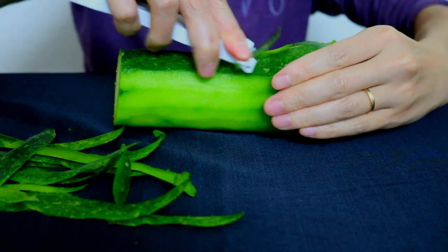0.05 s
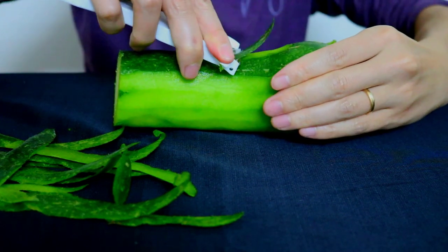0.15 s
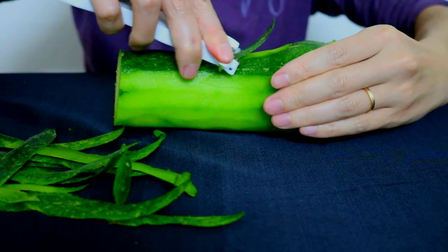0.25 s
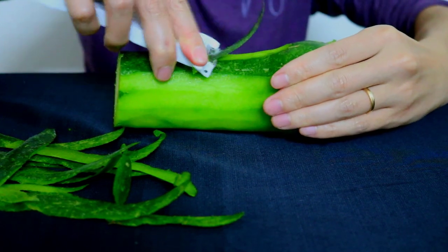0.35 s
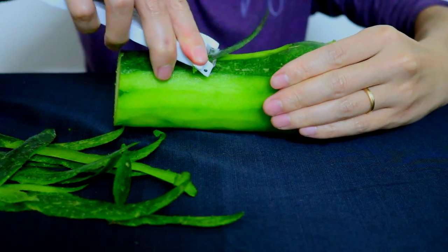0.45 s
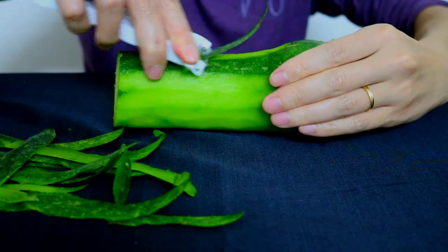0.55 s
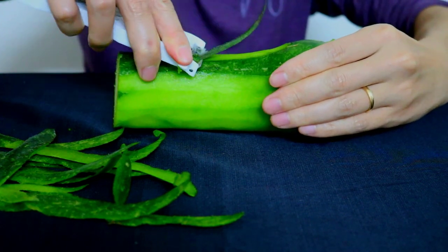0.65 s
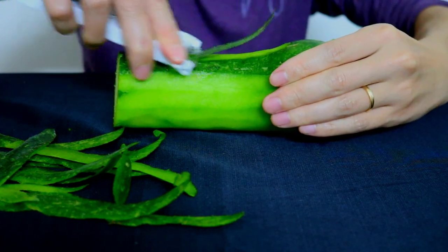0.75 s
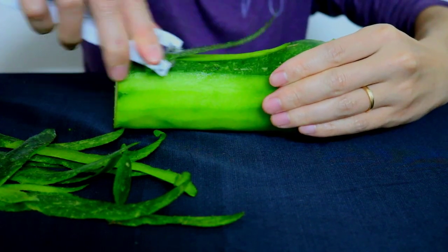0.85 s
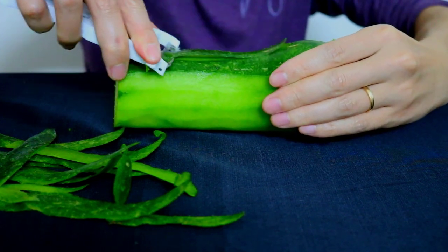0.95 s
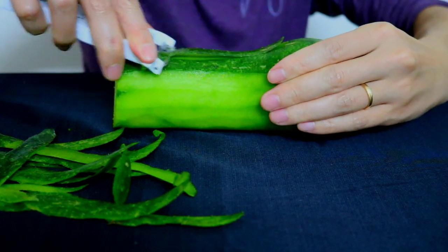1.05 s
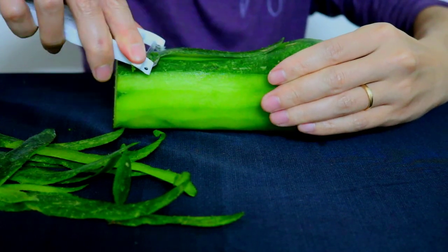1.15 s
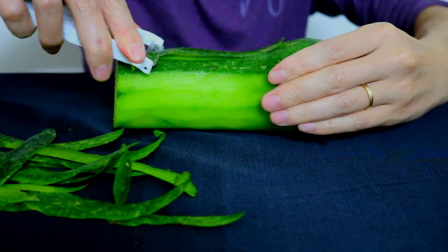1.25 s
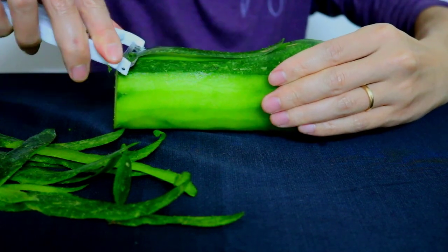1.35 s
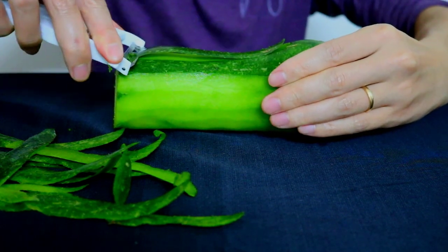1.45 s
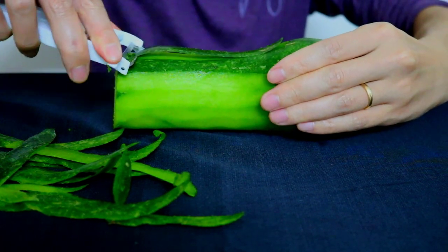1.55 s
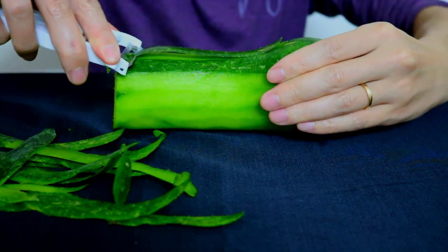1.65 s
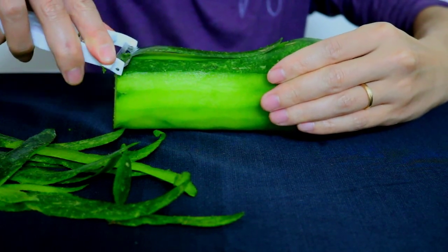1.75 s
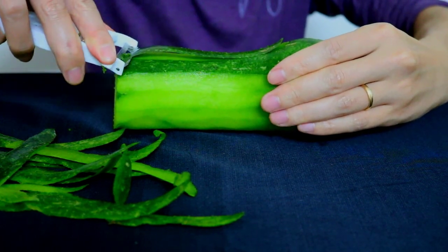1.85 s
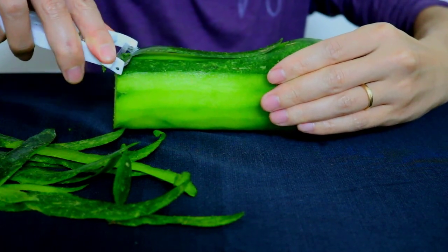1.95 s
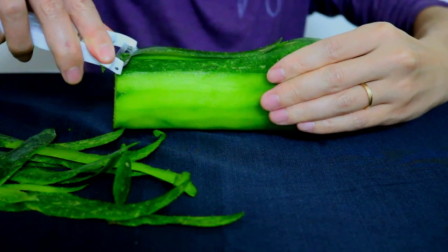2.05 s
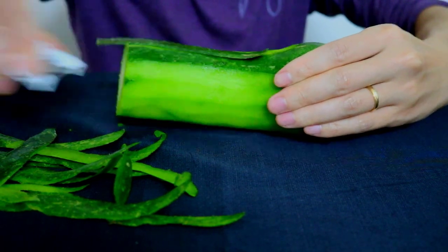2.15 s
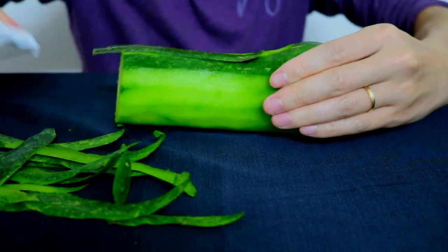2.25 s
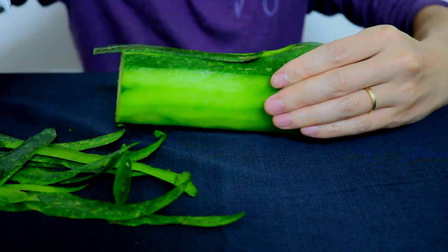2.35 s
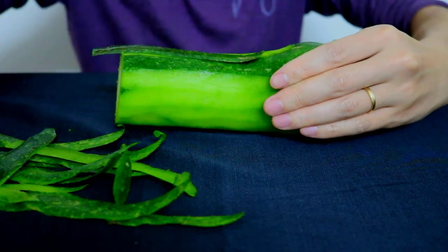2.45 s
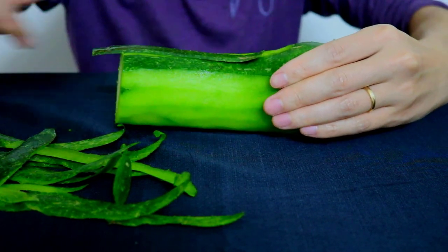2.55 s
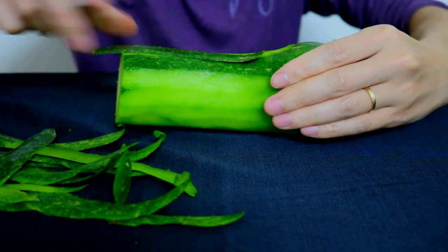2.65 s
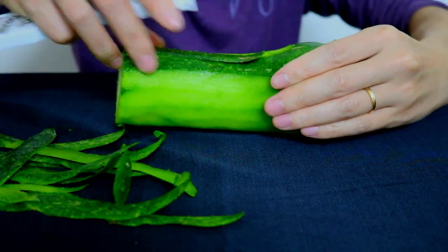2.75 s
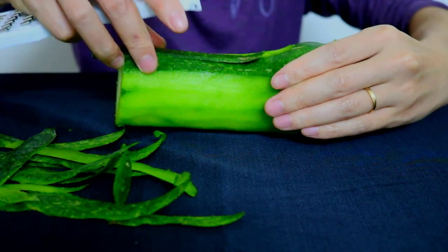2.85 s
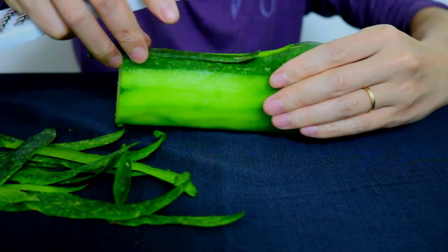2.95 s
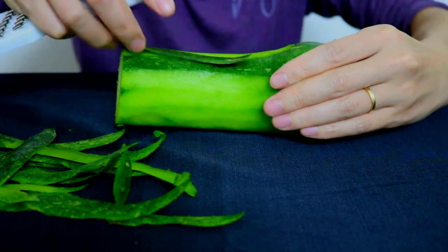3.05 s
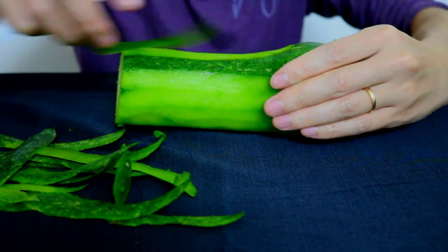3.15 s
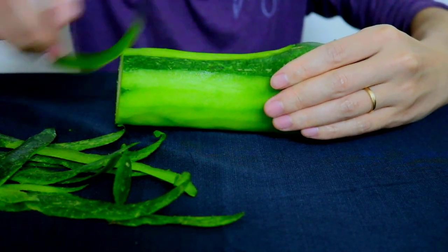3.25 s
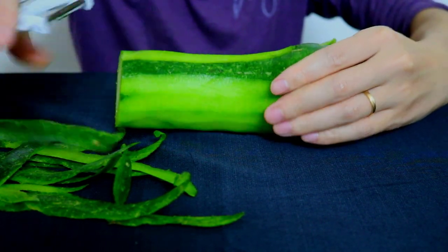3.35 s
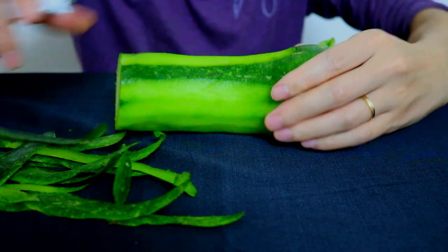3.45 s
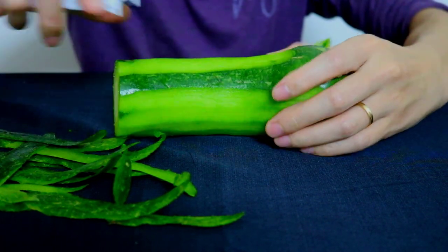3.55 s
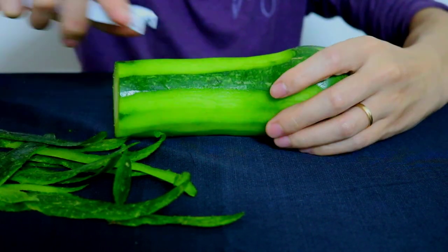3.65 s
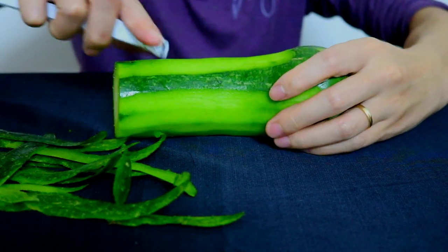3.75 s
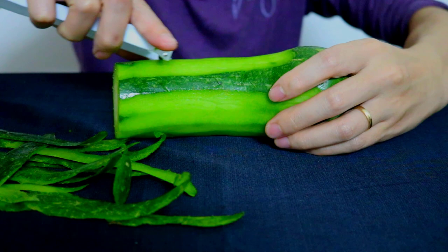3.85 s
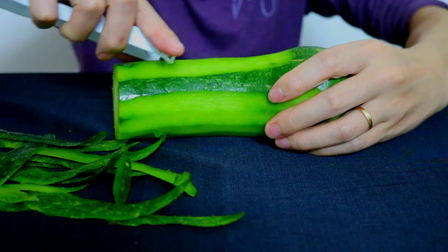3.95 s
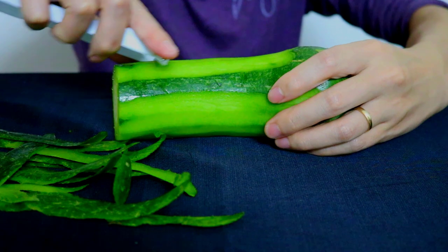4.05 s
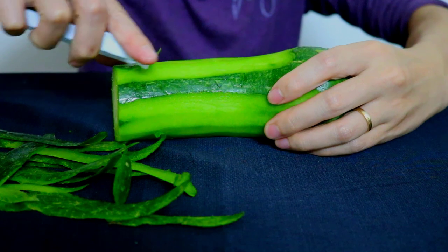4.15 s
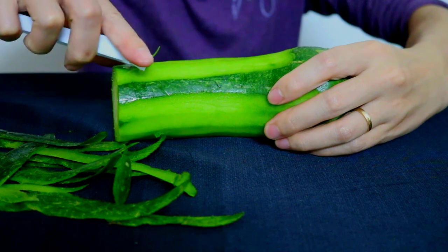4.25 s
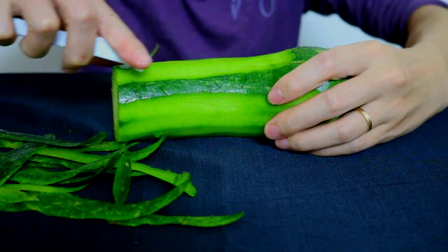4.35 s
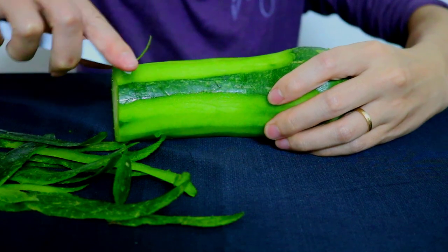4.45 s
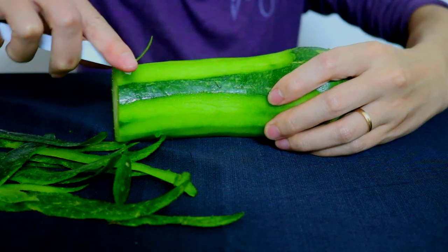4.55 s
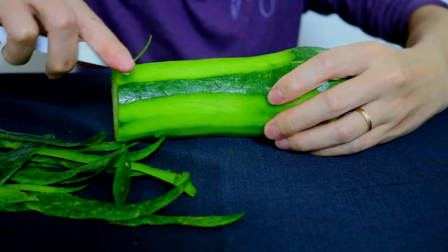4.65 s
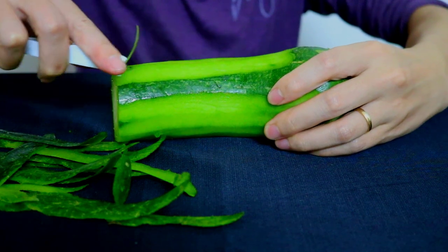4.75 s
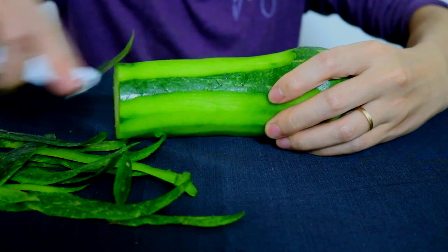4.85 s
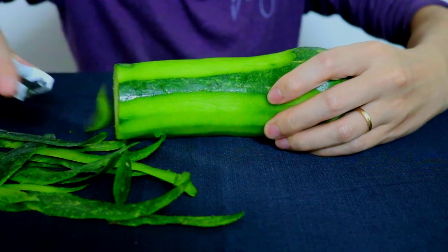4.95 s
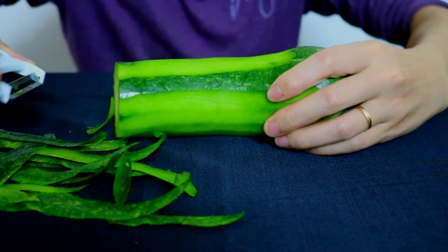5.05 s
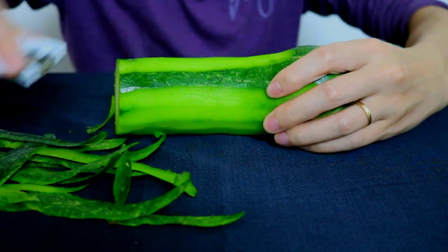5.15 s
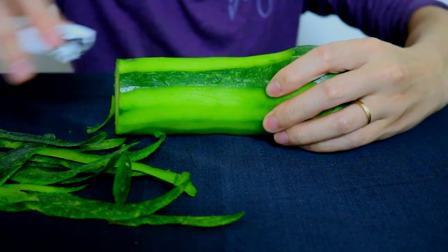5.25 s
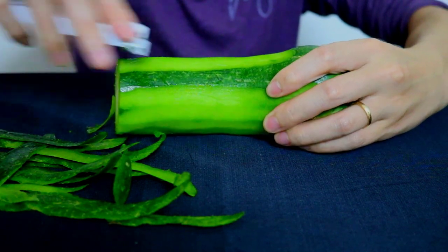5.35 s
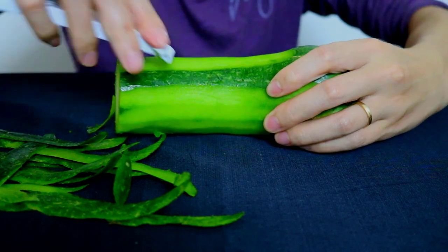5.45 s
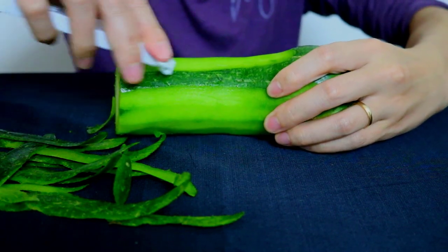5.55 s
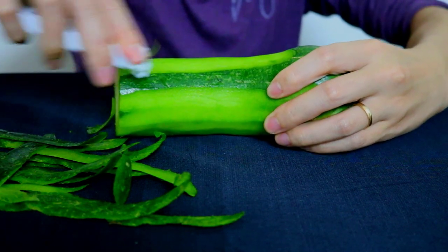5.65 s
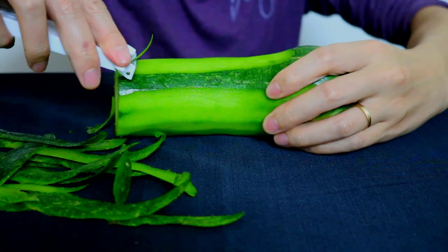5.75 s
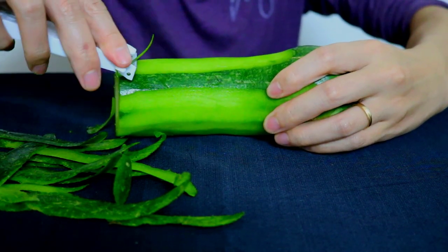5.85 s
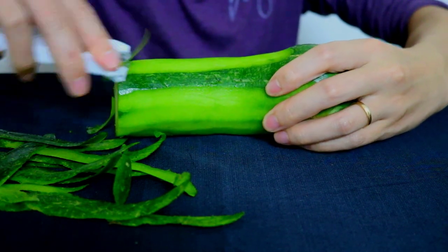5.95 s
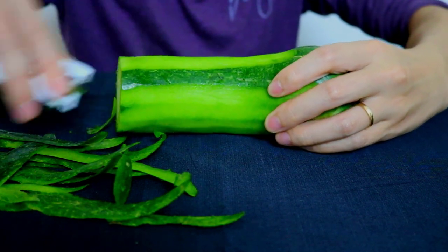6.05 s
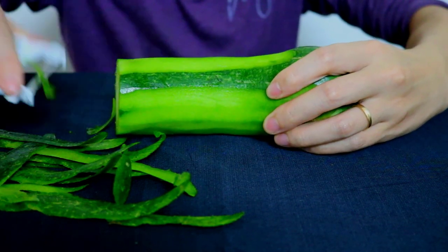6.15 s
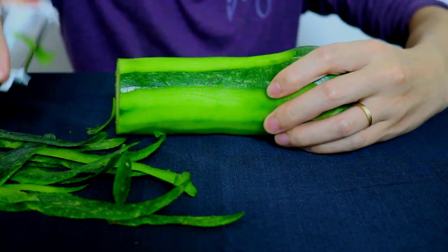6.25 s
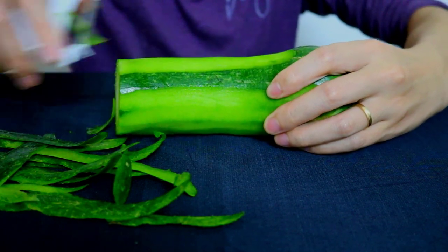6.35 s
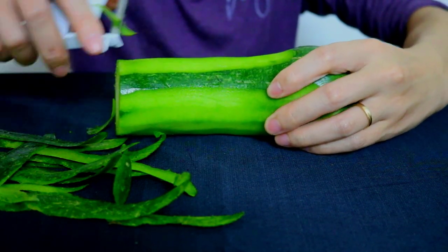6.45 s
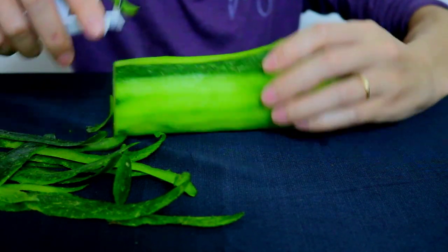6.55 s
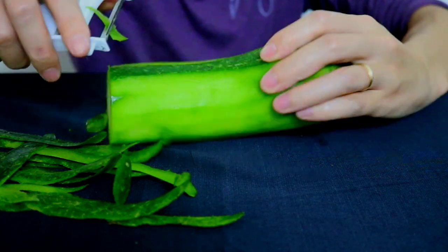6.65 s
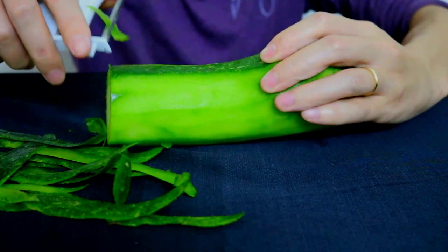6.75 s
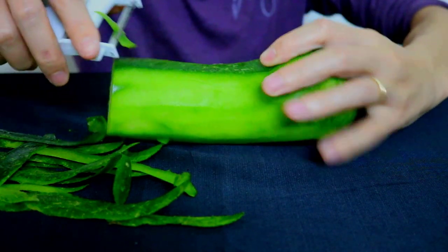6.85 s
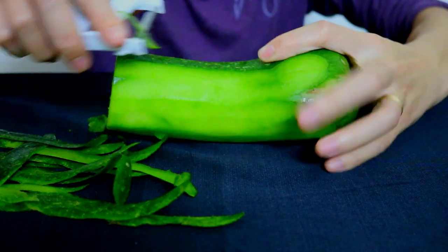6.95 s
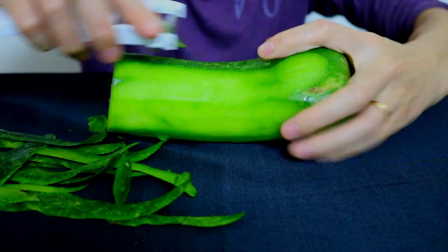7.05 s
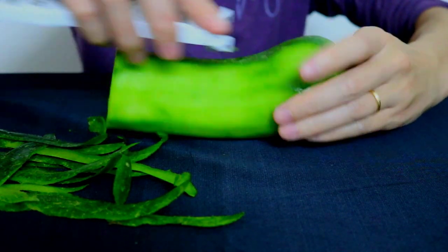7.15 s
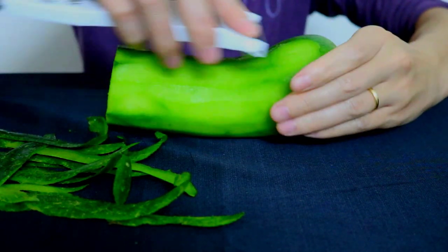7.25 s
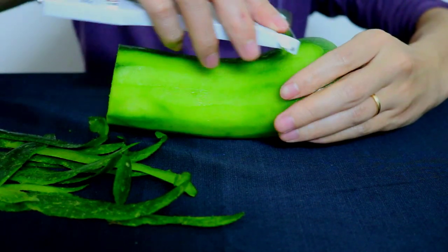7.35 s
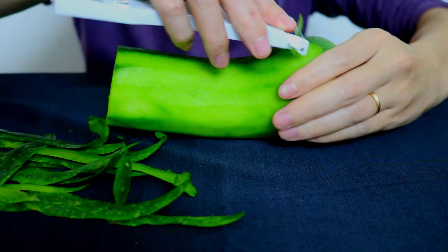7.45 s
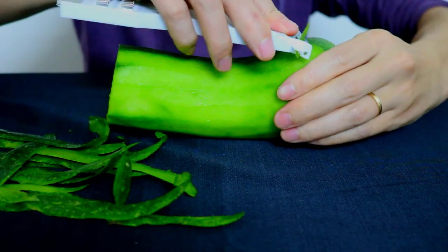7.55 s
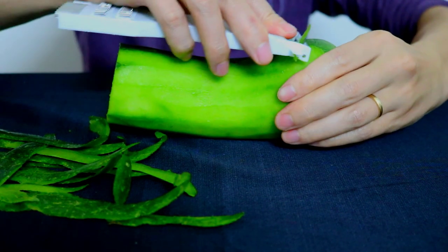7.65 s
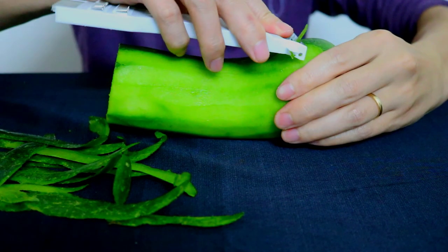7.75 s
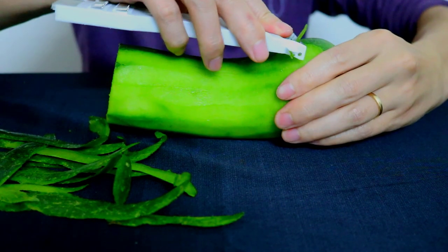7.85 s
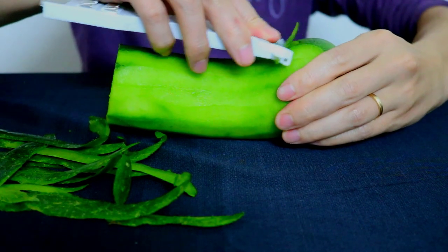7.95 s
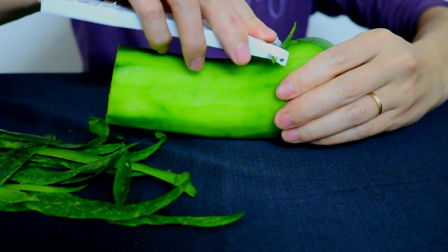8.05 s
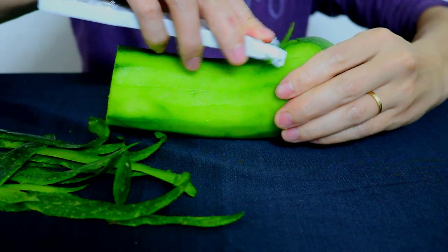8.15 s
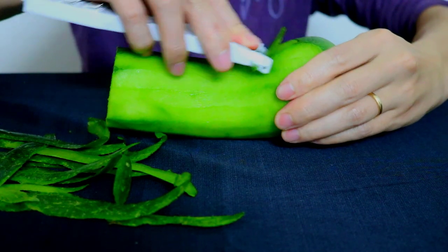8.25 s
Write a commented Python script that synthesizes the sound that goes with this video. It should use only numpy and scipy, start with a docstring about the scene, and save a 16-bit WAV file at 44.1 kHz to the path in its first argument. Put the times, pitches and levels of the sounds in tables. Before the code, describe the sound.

A peeler rasps in short quick strokes along a firm hollow melon, with sharp clicks, dull knocks and rustling pauses in a small room.

```python
"""Nine quick peeler strokes rasp along a firm green melon on a cloth-covered table, close to the microphone.
A sharp, bright snap ends that run; hands then brush and rub, with small ticks and knocks, until strokes resume at 4 s.
Slower strokes, clicks and knocks mix until 6.7 s; handling and knocks lead to two last strokes from 8 s.
Random snaps make the rasp and shake the rings of peeler and melon; noise bursts make the clicks.
Handling is filtered snaps, knocks are struck rings; a small room echoes over quiet air and a faint high whine."""
import sys
import numpy as np
from scipy import signal
from scipy.fft import rfft, irfft
from scipy.io import wavfile
from scipy.ndimage import uniform_filter1d

SR = 44100
rng = np.random.default_rng(int(sys.argv[2]) if len(sys.argv) > 2 else 0)


def master(y):
    """Save y as 16-bit WAV."""
    cut = np.clip(np.atleast_2d(y).T, -1, 1)
    pcm = np.round(cut * 32767)  # scale
    wavfile.write(sys.argv[1], SR, pcm.astype(np.int16))


N = 366471
TIME = np.arange(N) / SR
TOP_HZ = 15850  # upper edge of the room echoes and of the whole sound

# Strokes of the blade. Each row: start in seconds, swell in seconds, fade in seconds,
# rind rasp, melon body and peeler ring in dB (each before its layer trim),
# place from 0 at the held end to 1 at the cut end, firmness in dB per octave (more tilts the ring upwards),
# and the delay of the melon's crest in seconds (before the force lead).
STROKES = [ (0.0, 0.0035, 0.12, -51, -42.5, -38, 0.6, 5, 0.015),
           (0.123, 0.046, 0.065, -26.5, -26, -19.5, 0, 4, 0.036),
           (0.342, 0.041, 0.09, -27.5, -25, -16.5, 0.04, 2.5, -0.017),
           (0.601, 0.055, .060, -33, -24.5, -23.5, 0.16, 2.5, 0.015),
           (0.827, 0.055, 0.087, -27.5, -22, -17.5, 0.44, 2, 0.0074),
           (1.111, 0.053, 0.049, -30, -22, -27, 0.73, -0.5, 0.014),
           (1.335, .061, 0.066, -26.5, -20, -27.5, 0.85, 1.5, 0.033),
           (1.741, 0.049, 0.042, -42, -29, -56, 0.93, -1.5, 0.012),
           (2.158, 0.042, 0.035, -24, -16.5, -31.5, 0.6, 1, -0.0095),
           (4.077, 0.14, 0.084, -33, -24.5, -25.5, 0.96, 1, 0.017),
           (4.444, 0.046, 0.055, -28.5, -20.5, -25, 1, 1, 0.014),
           (4.723, 0.023, 0.24, -38.5, -29, -40.5, 1, -1, -0.01),
           (4.866, 0.027, 0.011, -32, -20, -23.5, 0.96, 4.5, 0.0013),
           (5.64, 0.091, 0.072, -28, -23, -21.5, 0.64, 0, 0.053),
           (6.021, 0.056, 0.02, -26.5, -18.5, -23, 0.68, 2, -0.0015),
           (6.646, 0.07, 0.087, -34.5, -37, -54, .53, -2, -0.048),
           (7.963, 0.049, 0.077, -31.5, -19, -22, 0.43, -2, -0.023),
           (8.248, 0.028, 0.075, -22.5, -20, -16, 0.34, 0, .025), ]
# How strongly each pitch is present in the rasp. Each row: frequency in Hz, relative level in dB per Hz.
RASP_SPECTRUM = [(150, -64), (400, 5), (900, 2.5), (2200, 2), (3200, 0.5), (4300, 2), (5700, 1.5),
                 (7600, 4), (9800, 3), (11500, 2.5), (13300, -1), (14500, -14)]
# Loudness curves of a stroke. Each holds: depth at the start in dB for a typical swell,
# depth at the end in dB, power of the curve.
RASP_ARCH = (12.4, 15.7, 1.52)
MELON_ARCH = (9.6, 13.3, 2.5)
PEELER_ARCH = (10.4, 24.8, 2.32)
RASP_TRIM_DB, MELON_TRIM_DB, PEELER_TRIM_DB = -0.3, -4, -6
FORCE_LEAD_S = 0.0051
PEELER_LEAD = 0.4  # share of the melon's delay by which the peeler crests early


def peeling():
    """Uneven slips of the blade burst rind cells, which rasp and shake peeler and melon."""
    slips = undb(1.3 * walk(420) + 1.0 * walk(70))
    # two separate streams of bursting cells, so the low rasp and the fine fizz flicker apart
    low_cells, high_cells = (unit(snaps(7000, 2.0) * slips * undb(0.77 * walk(150))) for _ in range(2))
    low_rasp = signal.sosfilt(signal.butter(2, 4500, "low", fs=SR, output="sos"), low_cells)
    high_fizz = signal.sosfilt(signal.butter(2, 4500, "high", fs=SR, output="sos"), high_cells)
    cells = low_rasp + high_fizz
    # the drag on fruit and handle is the sum of many fractures, so it is steadier
    drag = unit(snaps(4500, 0.63) * slips ** 0.6)
    crack = colour(RASP_SPECTRUM)
    echo_lags = rng.integers(10, 150, (len(STROKES), 3))  # in samples
    out = np.zeros(N)
    for row, lags in zip(STROKES, echo_lags):
        start, swell, fade, rasp_db, body_db, ring_db, place, firmness_db, delay = row
        span = slice(max(int((start - 0.06) * SR), 0), int((start + 0.5) * SR))
        rasp = cells * arch(start, swell, fade, RASP_ARCH)
        blade = drag * arch(start, swell, fade, PEELER_ARCH, -PEELER_LEAD * delay)
        # the heavy fruit takes a moment to build up, so the force leads its sound
        force = drag * arch(start - FORCE_LEAD_S, swell, fade, MELON_ARCH, delay)

        rasp_sound = through(rasp[span], nearby(crack, lags, echo_db=-13))
        peeler_sound = through(blade[span], peeler_ring(place, firmness_db))
        melon_sound = through(force[span], melon_ring(place, firmness_db))
        out[span] += undb(RASP_TRIM_DB + rasp_db) * rasp_sound
        out[span] += undb(PEELER_TRIM_DB + ring_db) * peeler_sound
        out[span] += undb(MELON_TRIM_DB + body_db) * melon_sound
    return out


# Resonances of the melon. Each row: frequency in Hz, width in Hz,
# relative height in dB at the held end, change in dB towards the cut end.
MELON_MODES = [(88, 43, -13, -1.5), (171, 43, -12.5, 4.5), (225, 12.4, 3.5, 1), (267.8, 36.4, -11, 7.5),
               (369, 29.3, -14.5, 17.5), (429, 74, -19, 15.5), (493.5, 26, 1, 5.5),
               (518.6, 50, -17.5, 16.5), (826.5, 114, -11, 8), (896.4, 106, -5.5, -3.5)]


def melon_ring(place, firmness_db):
    """The hollow voice of the fruit: its low resonances, struck at one place."""
    return struck(MELON_MODES, place, firmness_db, low_hz=69.4, high_hz=1170)


# Resonances of the peeler. Each row: frequency in Hz, width in Hz,
# relative height in dB at the held end, change in dB towards the cut end.
PEELER_MODES = [(1047, 76, 1, -1.5), (1175, 56, 7.5, -9), (1277, 30, -2, 3), (1317, 55, 2, -2),
                (1445, 178, -3.5, 5.5), (1700, 160, -5.5, 3), (1886, 194, -5.5, -0.5),
                (2880, 470, -15.5, 5), (3950, 790, -11.5, -0.5), (4740, 320, -5, -24),
                (5120, 110, -12, -23), (9880, 1300, -12, -5.5)]


def peeler_ring(place, firmness_db):
    """The brighter ring of the plastic handle and its steel blade."""
    return struck(PEELER_MODES, place, firmness_db, low_hz=700, high_hz=13100)


# The blade rattles on its pivot or flicks free; rows a few milliseconds apart can be heard as one snap.
# Each row: time in seconds, peak level in dB, lower edge in Hz, upper edge in Hz.
CLICKS = [ (2.195, -12, 7000, 15800), (2.198, -5, 9500, 15800), (2.569, -40, 2500, 12000),
          (2.65, -39, 2500, 12000), (2.700, -26, 980, 5900), (2.812, -40, 1500, 8000),
          (3.446, -21, 690, 3840), (3.5575, -32.5, 2500, 9000), (3.61, -26, 6000, 14900),
          (3.9748, -30.5, 3850, 4600), (4.054, -38, 2500, 8000), (4.409, -37, 5000, 6600),
          (4.9203, -9.5, 3750, 8350), (4.925, -19, 3000, 8940), (4.941, -21.5, 3500, 8900),
          (5.586, -28, 2000, 8000), (5.593, -24.5, 3000, 9550), (5.598, -14, 5300, 9200),
          (6.1044, -20, 3000, 10300), (7.192, -44, 1500, 9000), (7.5628, -8.5, 3160, 8150),
          (7.5644, -15.5, 5700, 8500), (7.729, -35, 1500, 12000), (7.9348, -35, 1500, 10200),
          (7.967, -32, 1200, 13000), ]


def clicks():
    """Steel chatters against plastic for a millisecond or two: short bursts of banded noise."""
    out = np.zeros(N)
    noises = rng.standard_normal((len(CLICKS), SR // 20))
    for (when, db, low_hz, high_hz), chatter in zip(CLICKS, noises):
        band = signal.butter(2, [low_hz, high_hz], "band", fs=SR, output="sos")
        burst = contact(chatter, decay=0.0015, settle_db=-32)
        add(out, when, signal.sosfilt(band, burst), db)
    return out


# Blows on the melon. Each row: time in seconds, peak levels of melon body, peeler ring
# and table thud in dB, firmness in dB per octave.
KNOCKS = [ (2.19, -19, -42, -38, 8), (2.211, -38, -23, -30.5, 0), (2.701, -45.5, -38, -70, 9),
          (3.4446, -19.5, -29.5, -71, .5), (3.977, -42.5, -38.5, -49, 10), (4.278, -26, -40, -60, -3.5),
          (4.89, -23.5, -23, -45, -2), (5.599, -26, -22, -44, 1.5), (6.084, -22.5, -31, -25.5, 2.5),
          (6.933, -48, -42.5, -53.5, 5), (7.193, -43.5, -46, -44, 3), (7.562, -29.5, -29.5, -35.5, 15),
          (7.73, -26.5, -31, -42, -2), (7.745, -18.5, -28.5, -38.5, -1.5), (7.94, -18.5, -34.5, -35, -4.5),
          (7.957, -19.5, -41, -48, -4), ]
# Resonances of the table top. Each row: frequency in Hz, width in Hz, relative height in dB.
TABLE_MODES = [(55.4, 17, 9.5), (86.6, 14, 11), (156, 25, 6)]


def knocks():
    """The peeler lands or lets go: melon, peeler and table ring together, each at its own level."""
    out = np.zeros(N)
    thud = signal.sosfilt(signal.butter(2, 200, fs=SR, output="sos"), ring(TABLE_MODES))
    # the flesh gives way, so it feels a soft push
    push = signal.butter(1, 600, fs=SR, output="sos")
    starts = [row[0] for row in STROKES]
    stroke_firmness = [row[7] for row in STROKES]
    noises = rng.standard_normal((len(KNOCKS), SR // 20))
    for (when, body_db, peeler_db, thud_db, firmness_db), chatter in zip(KNOCKS, noises):
        # the firmness of the strokes around the knock serves as its place, later limited to 0-1
        place = np.interp(when, starts, stroke_firmness)
        touch = contact(chatter, decay=0.00074, settle_db=-22)
        add(out, when, signal.sosfilt(push, melon_ring(place, firmness_db)), body_db)
        add(out, when, through(peeler_ring(place, firmness_db), touch), peeler_db)
        add(out, when, thud, thud_db)
    return out


# Movements of fingers, sleeve and loose peel. Each row: start in seconds, swell in seconds,
# fade in seconds, brushing in dB and dull rubbing in dB (each before its layer trim).
HANDLING = [ (2.451, 0.14, 0.034, -43, -63), (2.62, .05, 0.051, -41, -63), (2.78, 0.09, 0.09, -63, -44),
            (2.98, 0.043, .05, -68, -43), (3.08, 0.042, 0.17, -47.5, -46.5), (3.47, 0.12, 0.086, -42, -44),
            (3.719, 0.069, 0.045, -52.5, -60), (4.66, 0.066, .03, -47.5, -43), (6.20, 0.13, 0.14, -51, -61),
            (6.87, 0.22, 0.11, -46.5, -47), (7.32, .06, 0.064, -49.5, -50), ]
# Spectra of brushing and rubbing. Each row: frequency in Hz, relative level in dB per Hz.
BRUSH_SPECTRUM = [(500, -12), (1500, -6.5), (3000, -1.5), (7000, 6.5), (12000, 4.5), (15500, -9.5)]
RUB_SPECTRUM = [(24, -43), (45, -6.5), (118, -17.5), (231, 1), (341, -21), (489, -1), (636, -27),
                (787, -12.5), (2000, -45), (4000, -78)]
# Loudness curve of a movement: depth at the start in dB for a typical swell,
# depth at the end in dB, power of the curve.
HANDLING_ARCH = (8.1, 16, 0.97)


def handling():
    """Skin and sleeve brush over rind and cloth in small catches while the fruit rubs on the table."""
    catches = snaps(2500, 2.8) * undb(3 * walk(40))
    grain = undb(-3.5) * unit(through(catches, colour(BRUSH_SPECTRUM)))
    rumble = undb(-4.5) * unit(through(snaps(300, 2.5), colour(RUB_SPECTRUM)))
    out = np.zeros(N)
    for start, swell, fade, brush_db, rub_db in HANDLING:
        touch = undb(brush_db) * grain + undb(rub_db) * rumble
        out += arch(start, swell, fade, HANDLING_ARCH) * touch
    return out


# Room echoes in bands, each reaching up to the next.
# Each row: lower band edge in Hz, relative level in dB, time to fall by 60 dB in seconds.
ROOM = [(58.5, -6, 0.25), (174, -3.5, 0.4), (313, -10.5, 0.38), (776, -9, 0.49), (2410, -10.5, 0.5),
        (7750, -16.5, 0.61)]


def room(x):
    """Diffuse echoes of a small room: fading noise in bands, the highest fading slowest."""
    t = np.arange(SR) / SR
    response = np.zeros(SR)
    uppers = [row[0] for row in ROOM[1:]] + [TOP_HZ]
    for (low_hz, db, t60), high_hz in zip(ROOM, uppers):
        build_up = 1 - np.exp(-(t / 0.0025) ** 2)
        tail = rng.standard_normal(SR) * np.exp(-np.log(1000) * t / t60) * build_up
        tail = signal.sosfilt(signal.butter(3, [low_hz, high_hz], "band", fs=SR, output="sos"), tail)
        # wider bands carry more energy
        bandwidth_gain = np.sqrt(2 * (high_hz - low_hz) / SR)
        response += undb(db) * tail / np.linalg.norm(tail) * bandwidth_gain
    return through(x, response)


# Spectrum of the room air. Each row: frequency in Hz, relative level in dB per Hz.
AIR_SPECTRUM = [(25, -32), (107, -13.5), (184, -4.5), (350, -4.5), (520, -12.5), (1010, -18), (1430, -28),
                (3100, -30), (3850, -25), (5200, -29.5), (7400, -29), (15800, -30.5)]


def background():
    """Room air as gently wavering noise, and a thin, noisy electrical whine from two narrow bands."""
    air = unit(through(rng.standard_normal(N), colour(AIR_SPECTRUM)))
    air = air * undb(-53.5 + 0.39 * walk(6.7))
    narrow = unit(through(rng.standard_normal(N), ring([(8020, 78, 0)])))
    wide = unit(through(rng.standard_normal(N), ring([(7820, 300, 0)])))
    whine = narrow + undb(-7.5) * wide
    return air + undb(-62.5) * whine


def struck(modes, place, firmness_db, low_hz, high_hz):
    """Ring of unit energy for a contact at a place; more firmness favours the higher modes below 1 kHz."""
    place = np.clip(place, 0, 1)
    tilted = []
    for hz, width, db, change_db in modes:
        # the give of the flesh matters only below 1 kHz
        tilt_db = firmness_db * np.log2(min(hz / 1000, 1))
        tilted.append((hz, width, db + place * change_db + tilt_db))
    band = signal.butter(2, [low_hz, high_hz], "band", fs=SR, output="sos")
    response = signal.sosfilt(band, ring(tilted))
    return response / np.linalg.norm(response)


def nearby(response, lags, echo_db):
    """Fingers, fruit and table throw back early copies that ripple the spectrum; unit energy."""
    copies = np.zeros(len(response))
    for k, lag in enumerate(lags):
        copies[lag:] += (-1) ** k * response[:-lag]
    out = response + undb(echo_db) * copies
    return out / np.linalg.norm(out)


def contact(chatter, decay, settle_db):
    """A rough touch: a brief burst of chatter that settles weakly."""
    t = np.arange(len(chatter)) / SR
    attack = 1 - np.exp(-t / 0.00043)
    return chatter * attack * (np.exp(-t / decay) + undb(settle_db) * np.exp(-t / 0.024))


TYPICAL_SWELL_S, GENTLENESS = 0.05, 0.23  # longer swells start softer: power of the swell time
BITE_SHARE = 0.16  # time constant of the bite, as a share of the swell
RELEASE_S = 0.0066  # time constant of letting go


def arch(start, swell, fade, shape, lag=0):
    """Gain of one movement: it bites, swells to a crest, fades and lets go; slow ones start softer."""
    first_db, last_db, power = shape
    first_db = first_db * (swell / TYPICAL_SWELL_S) ** GENTLENESS
    end = start + swell + fade
    crest = np.clip(start + swell + lag, start + 0.002, end - 0.002)
    near = slice(max(int((start - 0.06) * SR), 0), int((end + 0.08) * SR))
    t, gain = TIME[near], np.zeros(N)
    rise_db = -first_db * np.interp(t, [start, crest], [1, 0]) ** power
    fall_db = -last_db * np.interp(t, [crest, end], [0, 1]) ** power
    before = np.maximum(start - t, 0) / (BITE_SHARE * swell)
    after = np.maximum(t - end, 0) / RELEASE_S
    gain[near] = undb(rise_db + fall_db) * np.exp(-before - after)
    return gain


def snaps(per_second, spread_db):
    """Random tiny fractures, most weak and a few strong."""
    happens = rng.random(N) < per_second / SR
    size = undb(spread_db * np.minimum(rng.exponential(size=N), 4))
    return unit(happens * size * rng.choice([-1, 1], N))


def walk(rate):
    """Smooth random wander with rms 1, drawing a new value about rate times a second."""
    k = max(int(SR / rate), 2)
    steps = np.repeat(rng.standard_normal(N // k + 1), k)
    return unit(uniform_filter1d(steps, k)[:N])


def colour(points, size=4096):
    """Causal impulse response with the given spectrum, made by folding its cepstrum forwards in time."""
    hz, db = np.transpose(points)
    grid_hz = np.arange(size // 2 + 1) * SR / size + 1
    cepstrum = irfft(np.log(undb(np.interp(np.log(grid_hz), np.log(hz), db))))
    cepstrum[1:size // 2] *= 2
    cepstrum[size // 2 + 1:] = 0
    return irfft(np.exp(rfft(cepstrum)))


def ring(modes, size=10000):
    """Impulse response of damped modes of alternating sign; dB is the height of each resonance."""
    t = np.arange(size) / SR
    out = np.zeros(size)
    for k, (hz, width, db) in enumerate(modes):
        decay = np.exp(-np.pi * width * t)
        out += (-1) ** k * undb(db) * width * decay * np.cos(2 * np.pi * hz * t)
    return out


def undb(db):
    """Decibels to gain."""
    return 10 ** (np.asarray(db) / 20)


def unit(x):
    """Scale to rms 1."""
    return x / np.sqrt(np.mean(x ** 2))


def through(x, response):
    """Pass a sound through an impulse response."""
    return signal.fftconvolve(x, response)[:len(x)]


def add(track, when, sound, db):
    """Mix a sound in at a time in seconds, with the given peak level."""
    start = int(when * SR)
    part = sound[:N - start]
    track[start:start + len(part)] += undb(db) * part / np.abs(sound).max()


def scene():
    """All sounds at the table, the room around them and the background."""
    work = peeling() + handling() + knocks()
    ticks = clicks()
    # the blade faces the microphone, so its clicks are drier
    echoes = room(work + undb(-1.5) * ticks)
    return (work + ticks + echoes + background())[None]


def record(dry):
    """The recorder sheds the deepest bass and cuts the top."""
    dry = signal.sosfilt(signal.butter(2, 40, "high", fs=SR, output="sos"), dry)
    return signal.sosfilt(signal.ellip(10, 0.2, 80, TOP_HZ, fs=SR, output="sos"), dry)


dry = scene()
out = record(dry)
master(out)
```